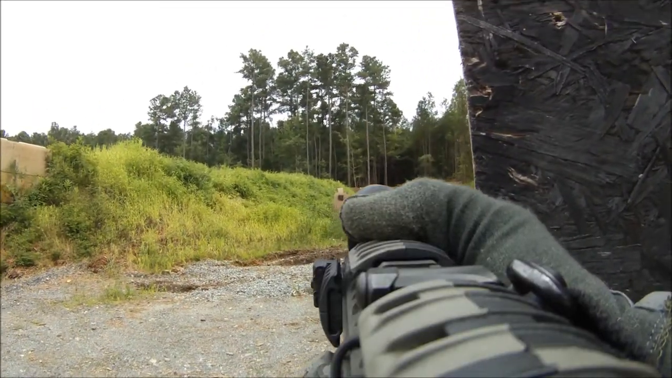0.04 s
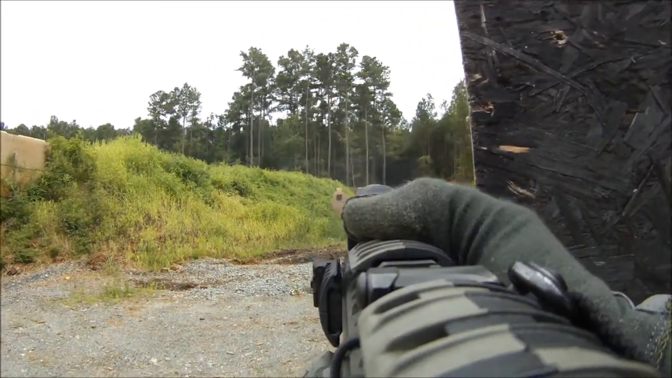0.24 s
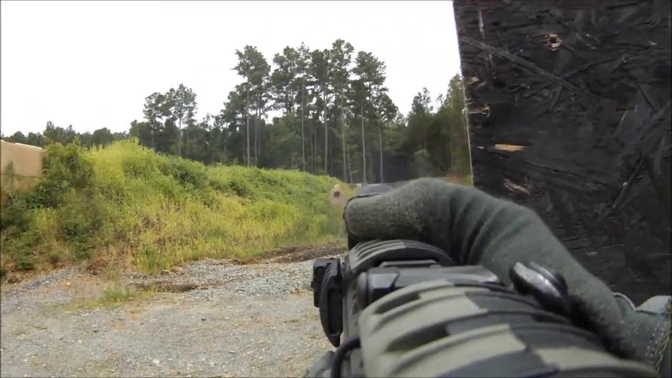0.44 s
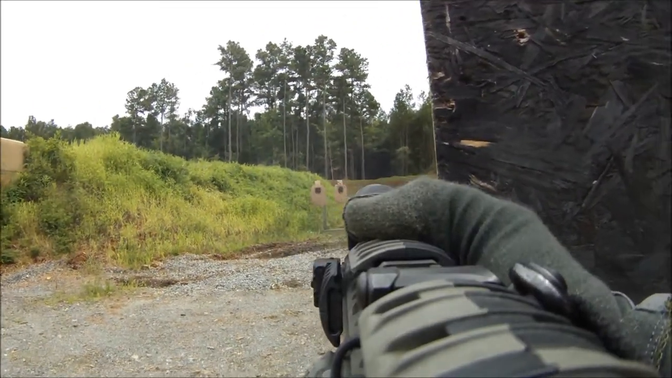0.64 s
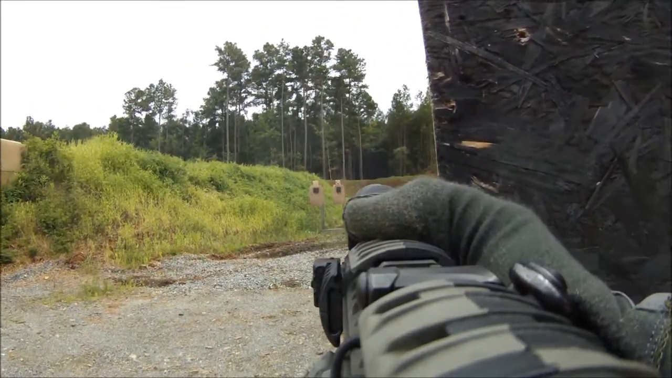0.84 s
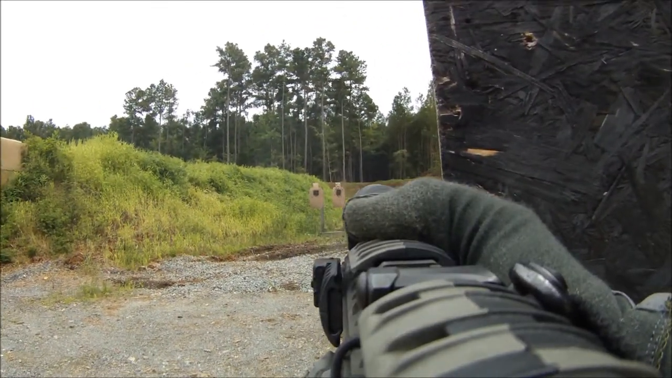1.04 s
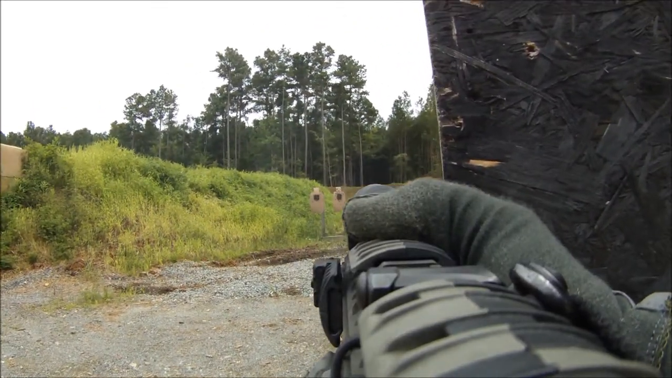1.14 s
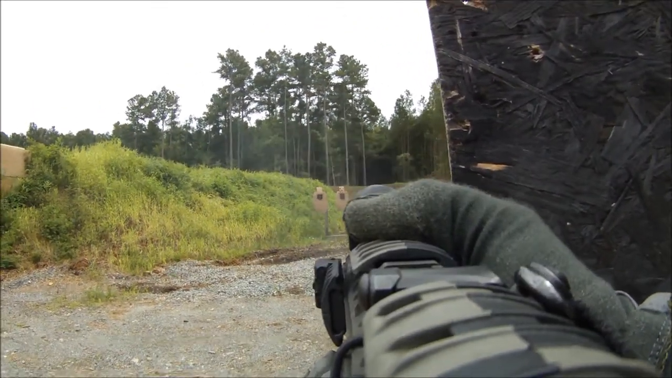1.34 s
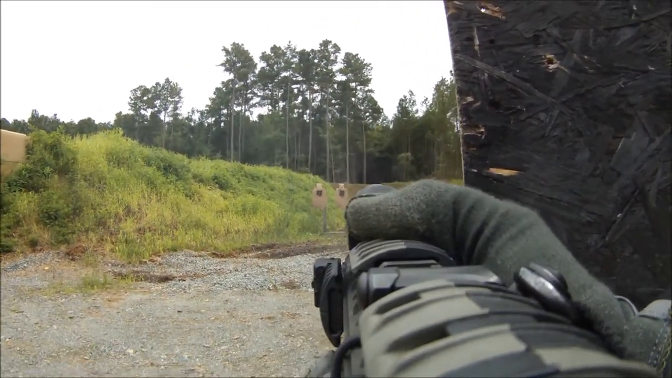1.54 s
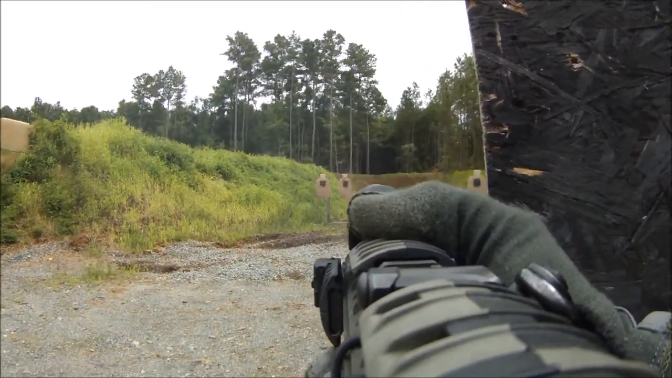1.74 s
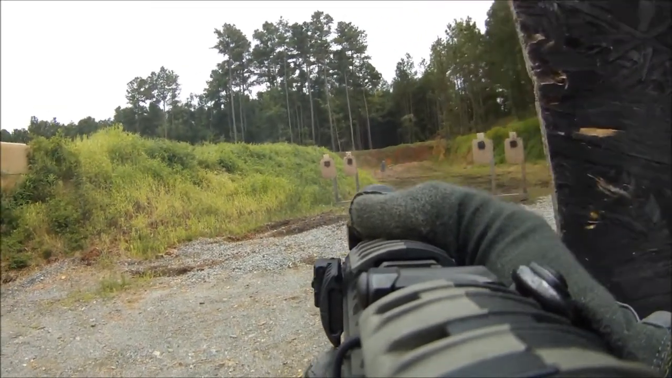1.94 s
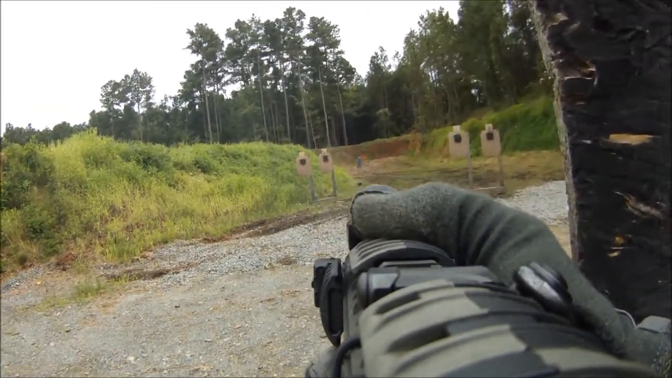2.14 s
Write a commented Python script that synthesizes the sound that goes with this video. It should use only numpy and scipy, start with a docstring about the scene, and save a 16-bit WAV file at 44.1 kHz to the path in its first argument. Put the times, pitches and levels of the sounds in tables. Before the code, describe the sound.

A self-loading rifle fires a quick pair, pauses about a second, then fires another pair at an outdoor range; steel bolt slams and echoes follow each shot, with the close microphone overloading.

```python
"""A soft knock and a thin bird whistle come first, then a self-loading rifle fires a quick pair, very close.
Each shot is a hammer click and a shaped-noise blast that overloads the microphone; noise and decaying tones
make the returns from earth banks and the roll from trees, while bursts of steel noise make the bolt slam home.
Small ringing metal ticks fill the pause before a second pair like the first.
More ticks, a faint rustle and a soft knock follow; still air, a steady coloured noise, lies under it all."""
import sys
import numpy as np
from scipy import signal
from scipy.fft import rfft, irfft
from scipy.io import wavfile

SR = 44100
rng = np.random.default_rng(int(sys.argv[2]) if len(sys.argv) > 2 else 0)


def pcm_store(signal):
    """Save signal as 16-bit PCM."""
    levels = np.round(np.clip(np.atleast_2d(signal), -1, 1) * 32767)
    wavfile.write(sys.argv[1], SR, levels.astype(np.int16).T)


N = 94815  # length of the scene [samples]

# In all tables "t60" is the time a sound takes to fade by 60 dB,
# and "hold" is the time from the start of a sound until its fade begins.


def amp(db):
    """Turns decibels into a plain gain."""
    return 10 ** (np.asarray(db) / 20)


def clock(seconds):
    """Gives the time of every sample, in seconds."""
    return np.arange(int(seconds * SR)) / SR


def read(table, hz, axis=1):
    """Reads one column of a table at these frequencies, evenly spaced by pitch."""
    columns = np.transpose(table)
    return np.interp(np.log(hz + 1), np.log(columns[0]), columns[axis])


def add(mix, start, sound):
    """Mixes a sound in at a start time in seconds."""
    part = mix[max(round(start * SR), 0):][:len(sound)]
    part += sound[:len(part)]


def swell(t, rise, hold, t60):
    """A straight rise from silence, times an exponential fade that begins at the hold time."""
    attack = np.minimum(t / max(rise, 1e-5), 1)
    fade = amp(-60 * np.maximum(t - hold, 0) / t60)
    return attack * fade


def noise(size):
    """White noise: an even hiss."""
    return rng.standard_normal(size)


def smooth_noise(size, count):
    """Noise with equal strength at every frequency and random phases, repeated count times."""
    phases = np.exp(2j * np.pi * rng.random(size // 2 + 1))
    return np.tile(irfft(phases, size) * np.sqrt(size), count)


def colour(white, table):
    """Makes some pitches of a white noise stronger than others and keeps its power."""
    gain = amp(read(table, np.fft.rfftfreq(len(white), 1 / SR)))
    even_power = gain / np.sqrt(np.mean(gain ** 2))
    return irfft(rfft(white) * even_power, len(white))


def by_band(x, envelope, count=12):
    """Splits a sound into overlapping bands and shapes each with its own envelope(t, hz)."""
    t = np.arange(len(x)) / SR
    hz = np.fft.rfftfreq(len(x), 1 / SR)
    centres = np.geomspace(70, 14000, count)
    spectrum = rfft(x)
    out = np.zeros(len(x))
    for centre, peak in zip(centres, np.eye(count)):
        weight = np.interp(np.log(hz + 1), np.log(centres), peak)
        out += irfft(spectrum * weight, len(x)) * envelope(t, centre)
    return out


def ring(modes, t):
    """Struck metal or a hollow space: pure tones that die away."""
    return sum(amp(db - 60 * t / t60) * np.sin(2 * np.pi * hz * t) for hz, db, t60 in modes)


ALIKE_BELOW_HZ = 2500  # around here the shared sound gives way to fresh noise


def alike(shared):
    """Keeps the bass and mids that all shots share and draws fresh treble."""
    hz = np.fft.rfftfreq(len(shared), 1 / SR)
    same = 1 / np.sqrt(1 + (hz / ALIKE_BELOW_HZ) ** 4)
    fresh = np.sqrt(1 - same ** 2) * rfft(noise(len(shared)))
    return irfft(same * rfft(shared) + fresh, len(shared))


# The shots: (time [s], level [dB], hammer level [dB], lead of the hammer before the blast [s])
SHOT_TIMES = [(0.2067, 1, -5, 0.0049), (0.3683, 0.5, -27.5, .004), (1.3653, 0.5, -25, .004),
              (1.5255, 0.5, -27.5, .004)]


def shots():
    """Each shot is a hammer click, a blast, early returns from the banks and long echoes."""
    out = np.zeros(N)
    gas = smooth_noise(size=768, count=6)
    slap = smooth_noise(size=256, count=16)
    scatter = smooth_noise(size=3072, count=6)
    field = noise(size=49152)
    for start, db, hammer_db, lead in SHOT_TIMES:
        hammer(out, start - lead, hammer_db, lead)
        add(out, start, amp(db) * blast(gas))
        add(out, start, amp(db) * bay(scatter, slap))
        add(out, start, amp(db) * range_echo(field))
        add(out, start + BACKSTOP_DELAY_S, amp(db) * backstop())
        add(out, start + THUMP_DELAY_S, amp(db) * thump())
        add(out, start, amp(db) * tree_roll())
    return out


# The muzzle blast: (frequency [Hz], level per Hz [dB], rise [s], hold [s])
BLAST_BANDS = [(50.6, -36, 0.007, .012), (178, -22.5, .009, 0.0088), (290, -9.5, 0.0084, 0.014),
               (594, -3.5, 0.006, 0.012), (1110, -9, 0.0057, 0.01), (2080, -6.5, .003, 0.009),
               (3970, -15, 0.0031, 0.009), (6300, -18.5, 0.00027, 0.01), (9700, -22.5, .0003, 0.0026),
               (16200, -36, .0003, 0.0073)]
BLAST_DB, BLAST_T60_S = 0, 0.027
PORT_HZ, PORT_DB, PORT_T60_S = 6440, 4.5, 0.007


def blast(shared):
    """The shock front rings the microphone port; the gas cloud is noise whose treble rises fastest."""
    def envelope(t, hz):
        """Rise and fade of one band."""
        rise = read(BLAST_BANDS, hz, axis=2)
        hold = read(BLAST_BANDS, hz, axis=3)
        return swell(t, rise, hold, BLAST_T60_S)
    gas = by_band(colour(alike(shared), BLAST_BANDS), envelope)
    port = ring([(PORT_HZ, PORT_DB, PORT_T60_S)], np.arange(len(gas)) / SR)
    return amp(BLAST_DB) * gas + port


HAMMER_RISE_S, HAMMER_RING_DB = 0.0007, -8.5


def hammer(mix, start, db, lead):
    """The hammer and mechanism clatter and ring just before the blast."""
    add(mix, start, steel(db, HAMMER_RISE_S, lead / 2))
    add(mix, start, amp(db + HAMMER_RING_DB) * ring(TICK_TONES, np.arange(2048) / SR))


# Scatter from the gravel and banks: (frequency [Hz], level per Hz [dB])
SCATTER_COLOUR = [(50, -18.5), (120, -17), (180, -15.5), (250, 1), (400, 6.5), (650, 2), (820, -4),
                  (1400, -8.5), (2600, -5.5), (4000, -16), (6500, -21.5), (9500, -30.5), (16000, -40.5)]
SCATTER_DB, SCATTER_RISE_S, SCATTER_HOLD_S, SCATTER_T60_S = -19, 0.034, 0.068, 0.16
# Boom between the banks: (frequency [Hz], level [dB])
BOOM_TONES = [(236, -6), (284, -7.5), (366, -2), (424, -3), (500, -5), (531, -5.5), (583, -5), (654, 3.5),
              (713, -10), (892, -9.5), (1029, -10.5), (1222, -13)]
BOOM_DB, BOOM_DELAY_S, BOOM_RISE_S, BOOM_HOLD_S, BOOM_T60_S = -19, 0.018, 0.041, 0.045, 0.09
# Single echoes from the banks:
# (delay [s], crack level [dB], hollow body level [dB], body frequency [Hz], body t60 [s])
BANK_ECHOES = [(0.024, -20.5, -10.5, 290.2, .06), (.0295, -11.5, -9, 345.6, 0.062),
               (.0434, -1.5, -2, 568.2, 0.041), (.0505, -14.5, -12.5, 440, .03),
               (0.07, -13, -8, 331.7, 0.051)]
# Colour of an echo's crack: (frequency [Hz], level per Hz [dB], t60 [s])
CRACK_COLOUR = [(101, -32, 0.016), (308, -13.5, 0.01), (574, 1.5, .035), (1006, 2.5, .025),
                (2383, 0.5, .013), (4630, -6, 0.026), (8000, -17, 0.0054), (16000, -26.5, .006)]
CRACK_DB, CRACK_RISE_S, CRACK_HOLD_S, BODY_RISE_S = -4, 0.0002, 0.00033, 0.001


def bay(scatter, slap):
    """Banks send back dense scatter, a boom whose tones swell and die as one, and separate slaps."""
    t = np.arange(len(scatter)) / SR
    shape = swell(t, SCATTER_RISE_S, SCATTER_HOLD_S, SCATTER_T60_S)
    out = amp(SCATTER_DB) * colour(alike(scatter), SCATTER_COLOUR) * shape

    boom = sum(amp(db) * np.sin(2 * np.pi * hz * t) for hz, db in BOOM_TONES)
    boom_t = np.maximum(t - BOOM_DELAY_S, 0)
    out += amp(BOOM_DB) * boom * swell(boom_t, BOOM_RISE_S, BOOM_HOLD_S, BOOM_T60_S)

    def crack_envelope(t, hz):
        """Sharp start and fade of one band of a slap."""
        return swell(t, CRACK_RISE_S, CRACK_HOLD_S, read(CRACK_COLOUR, hz, axis=2))
    crack = by_band(colour(alike(slap), CRACK_COLOUR), crack_envelope)
    for delay, crack_db, body_db, hz, t60 in BANK_ECHOES:
        add(out, delay, amp(CRACK_DB + crack_db) * crack)
        body = ring([(hz, body_db, t60)], t)
        add(out, delay, body * np.minimum(t / BODY_RISE_S, 1))
    return out


PATCHY_DB, PATCH_S = 1.77, 0.016  # typical level change and spacing of the patches


def tail(white, table, rise):
    """Uneven terrain breaks an echo into patches; each band fades at its own speed."""
    def envelope(t, hz):
        """Uneven level and fade of one band."""
        patches = np.interp(t / PATCH_S, np.arange(256), noise(size=256))
        return amp(PATCHY_DB * patches) * swell(t, rise, 0, read(table, hz, axis=2))
    return by_band(colour(white, table), envelope)


# Reverberation of the range: (frequency [Hz], level per Hz [dB], t60 [s])
RANGE_BANDS = [(50, -28.5, 0.47), (148, -10.5, 0.77), (286, 5, 0.5), (576, 9, 0.5), (1053, -6.5, 0.69),
               (2200, -12.5, 0.69), (3900, -11, 0.53), (6260, -24, 0.53), (9500, -36, 0.81),
               (12000, -43, .33), (16000, -52.5, .28)]
RANGE_DB, RANGE_RISE_S = -14, 0.093


def range_echo(field):
    """Many reflections around the range blur into one fading noise."""
    return amp(RANGE_DB) * tail(alike(field), RANGE_BANDS, RANGE_RISE_S)


# Return from the far backstop: (frequency [Hz], level per Hz [dB], t60 [s])
BACKSTOP_BANDS = [(50, -20, 0.34), (140, -8, 0.2), (300, -6, 0.23), (600, 1.5, 0.57), (1200, 1.5, 0.42),
                  (2600, -3, .35), (6000, -17.5, 0.52), (10000, -33, .25), (16000, -56.5, .2)]
BACKSTOP_DB, BACKSTOP_DELAY_S, BACKSTOP_RISE_S = -35, 0.16, 0.02


def backstop():
    """The far backstop sends back a late, blurred echo."""
    return amp(BACKSTOP_DB) * tail(noise(size=24576), BACKSTOP_BANDS, BACKSTOP_RISE_S)


# Low thump returned by the far bank: (frequency [Hz], level [dB], t60 [s])
THUMP_TONES = [(70, -8, 0.13), (110, -4, .14), (150, -0.5, .16), (205, -1.5, .14), (270, -1.5, .12)]
THUMP_DB, THUMP_DELAY_S, THUMP_RISE_S = -41, 0.26, 0.006


def thump():
    """The far bank returns a low thump made of short bass tones."""
    t = np.arange(8192) / SR
    return amp(THUMP_DB) * ring(THUMP_TONES, t) * np.minimum(t / THUMP_RISE_S, 1)


# Roll from the distant trees: (frequency [Hz], level per Hz [dB], t60 [s])
ROLL_BANDS = [(60, -19, 0.88), (300, -10.5, 1.7), (520, -5.5, 1.8), (640, -0.5, 3), (1140, -12, 2.4),
              (2580, -6, 1.5), (5000, -16, 1.4), (10000, -37, 1), (16000, -61.5, .8)]
ROLL_DB, ROLL_RISE_S = -42.5, 0.47


def tree_roll():
    """Distant trees return a slow swell of noise that takes long to die."""
    return amp(ROLL_DB) * tail(noise(size=81920), ROLL_BANDS, ROLL_RISE_S)


# Steel parts of the action: (frequency [Hz], level per Hz [dB])
STEEL_COLOUR = [(100, -20.5), (600, -11), (1500, -9.5), (2100, -5.5), (2800, 0), (3400, -6.5), (3950, -1.5),
                (4700, -3), (5300, -1.5), (5700, 5), (6400, -8.5), (7200, -0.5), (8000, -9.5),
                (10500, -19.5), (16000, -26.5)]
STEEL_T60_S = 0.015


def steel(db, rise, hold):
    """Steel chatters on steel: a short burst of coloured noise."""
    white = smooth_noise(size=1024, count=3)
    shape = swell(np.arange(len(white)) / SR, rise, hold, STEEL_T60_S)
    return amp(db) * colour(white, STEEL_COLOUR) * shape


# Knocks and slides of the bolt: (time [s], level [dB], rise [s], hold [s])
BOLT_BLOWS = [(0.2824, -19, .001, 0.0079), (0.2919, -3.5, .003, 0.0086), (.3080, -4.5, .0005, 0.0011),
              (0.3125, -11.5, .0005, 0.0021), (0.3172, -18, .001, 0.0023), (0.431, -19, .001, .012),
              (0.4452, -2.5, .003, 0.0064), (0.4589, -9, .0005, 0.0037), (0.4834, -28, .001, .003),
              (1.4348, -21, .001, .002), (1.442, -19.5, .002, 0.0055), (1.4494, -2.5, .002, .007),
              (1.4650, -3, .0005, 0.0016), (1.4697, -22.5, .0005, .0015), (1.477, -28, .001, .003),
              (1.555, -15, .002, 0.0027), (1.581, -17.5, .001, 0.0082), (1.5964, -2.5, .002, 0.0075),
              (1.609, -8, .0004, 0.0028), (1.613, -20, .001, 0.0045)]
# Brief ring of the bolt carrier after each blow: (frequency [Hz], level [dB], t60 [s])
CARRIER_TONES = [(2610, -11, .04), (3030, -10, .04), (3980, -10, .025), (4770, -12, .035), (5700, 0, .03),
                 (6700, -11, .025), (7200, -6, .02)]
CARRIER_DB, BOLT_ECHO_DB = -9, -34.5


def bolt():
    """The bolt slides forward, slams shut and bounces; the bay echoes it."""
    out = np.zeros(N)
    for start, db, rise, hold in BOLT_BLOWS:
        add(out, start, steel(db, rise, hold))
        carrier = ring(CARRIER_TONES, np.arange(4096) / SR)
        add(out, start + rise, amp(db + CARRIER_DB) * carrier)

    def room_envelope(t, hz):
        """Fade of one band of the echo."""
        return swell(t, 0, 0, read(RANGE_BANDS, hz, axis=2))
    room = by_band(noise(size=32768), room_envelope)
    echo = signal.fftconvolve(out, room / np.linalg.norm(room))[:N]
    return out + amp(BOLT_ECHO_DB) * echo


# Light ticks of trigger and spent cases: (time [s], level [dB], rise [s])
TICK_TIMES = [(0.8712, -54.5, .0003), (1.0435, -48.5, .0003), (1.6673, -15.5, 0.0019), (1.7865, -26, .0006),
              (1.790, -34, 0.00054), (2.0042, -28, .0008), (2.102, -47.5, .0004)]
# Their ringing tones: (frequency [Hz], level [dB], t60 [s])
TICK_TONES = [(2420, -7, 0.022), (2842, -2, 0.012), (3350, -10.5, 0.018), (3822, -8, 0.024),
              (4384, -2.5, 0.01), (5393, -11, .02), (5700, -11.5, 0.016), (6630, -10, 0.012),
              (8850, -9, 0.009)]
TICK_GRIT_DB = -6  # rough steel noise, relative to the tick


def ticks():
    """Small metal parts ring with short tones and a little steel noise."""
    out = np.zeros(N)
    t = np.arange(4096) / SR
    for start, db, rise in TICK_TIMES:
        add(out, start, amp(db) * ring(TICK_TONES, t) * np.minimum(t / rise, 1))
        add(out, start, steel(db + TICK_GRIT_DB, rise, 0))
    return out


# Soft knocks of the rifle being handled: (time [s], level [dB])
KNOCK_TIMES = [(0.028, -45.5), (.170, -67), (2.137, -50.5)]
# Their colour: (frequency [Hz], level per Hz [dB])
KNOCK_COLOUR = [(60, -41), (300, -9), (550, -4.5), (850, -16), (1200, -7), (1800, -25), (3300, -26),
                (6000, -45), (16000, -65)]
KNOCK_RISE_S, KNOCK_HOLD_S, KNOCK_T60_S = 0.00052, 0.0015, 0.028


def knocks():
    """Handling the rifle makes dull knocks: short bursts of mostly low noise."""
    out = np.zeros(N)
    t = np.arange(4096) / SR
    for start, db in KNOCK_TIMES:
        dull = colour(smooth_noise(size=512, count=8), KNOCK_COLOUR)
        add(out, start, amp(db) * dull * swell(t, KNOCK_RISE_S, KNOCK_HOLD_S, KNOCK_T60_S))
    return out


# Bird whistles, one curve each: (time [s], frequency [Hz], level [dB])
WHISTLE_CURVES = [
    [(0, 4950, -55), (.007, 4560, -60), (.025, 4250, -69)],
    [(.1, 7300, -78), (.127, 7740, -69), (.14, 7100, -66), (.148, 6200, -68)],
    [(.14, 5850, -62), (.155, 6400, -59), (.164, 5200, -56), (.18, 4450, -60), (.197, 3660, -58)],
]


def bird():
    """A bird's thin whistles are pure tones that slide in pitch and end falling."""
    out = np.zeros(N)
    for curve in WHISTLE_CURVES:
        times, hz, db = np.transpose(curve)
        t = times[0] + clock(times[-1] - times[0])
        phase = 2 * np.pi * np.cumsum(np.interp(t, times, hz)) / SR
        soft_ends = signal.windows.tukey(len(t), .1)
        add(out, times[0], amp(np.interp(t, times, db)) * np.sin(phase) * soft_ends)
    return out


# Faint rustle as the rifle swings to the next mark: (time [s], level [dB])
SWING_LEVEL = [(1.719, -59), (1.84, -53), (1.95, -55.5), (2.04, -66.5), (2.15, -63)]
# Its colour: (frequency [Hz], level per Hz [dB])
RUSTLE_COLOUR = [(100, -5), (400, -8), (1500, 2), (3000, 2.5), (5500, -4), (9000, -22), (16000, -36)]


def swing():
    """Sleeve and sling rustle as the rifle turns: noise that swells and sinks."""
    out = np.zeros(N)
    times, db = np.transpose(SWING_LEVEL)
    t = times[0] + clock(times[-1] - times[0])
    rustle = colour(noise(N), RUSTLE_COLOUR)[:len(t)]
    add(out, times[0], amp(np.interp(t, times, db)) * rustle)
    return out


# The still air: (frequency [Hz], level per Hz [dB])
AIR_COLOUR = [(25, -8), (90, -1.5), (200, -8), (350, -7), (700, -1.5), (1500, -12), (4000, -19),
              (9000, -31.5), (16000, -44)]
AIR_DB = -66.5


def air():
    """Still air is a steady, very quiet coloured noise."""
    return amp(AIR_DB) * colour(noise(N), AIR_COLOUR)


def scene():
    """Everything reaches one microphone, heard the same on both sides."""
    mono = shots() + bolt() + ticks() + knocks() + bird() + swing() + air()
    return np.array([mono, mono])


MIC_CUT_HZ, DISTORTION_CUT_HZ, TOP_HZ = 100, 400, 15800
KNEE, CEILING = 9.7, 0.91  # a higher knee bends more sharply; full scale is 1


def record(dry):
    """The microphone thins deep bass, overloads with a rounded knee and cuts the highest treble."""
    bass_cut = signal.butter(2, MIC_CUT_HZ, "high", fs=SR, output="sos")
    thin = signal.sosfilt(bass_cut, dry)
    clipped = thin / (1 + abs(thin / CEILING) ** (2 * KNEE)) ** (1 / (2 * KNEE))
    # only the upper part of what the overload changes is kept
    distortion_cut = signal.butter(2, DISTORTION_CUT_HZ, "high", fs=SR, output="sos")
    distortion = signal.sosfiltfilt(distortion_cut, clipped - thin)
    loud = np.clip(thin + distortion, -1, 1)
    treble_cut = signal.firwin(255, TOP_HZ, window=("kaiser", 7), fs=SR)
    return signal.oaconvolve(loud, treble_cut[None], "same")


dry = scene()
out = record(dry)
pcm_store(out)
```